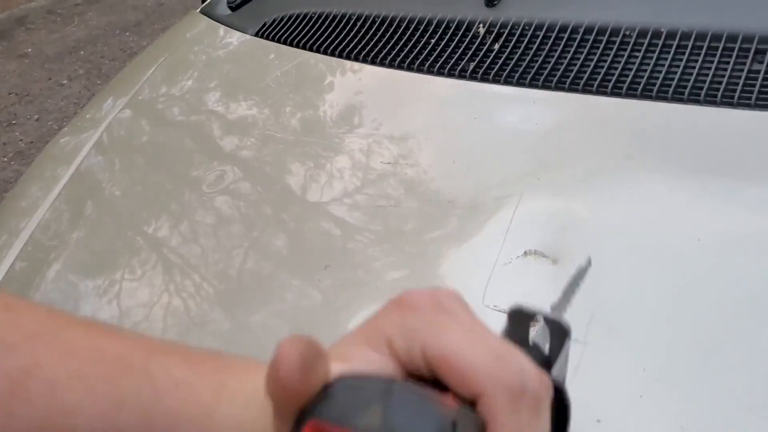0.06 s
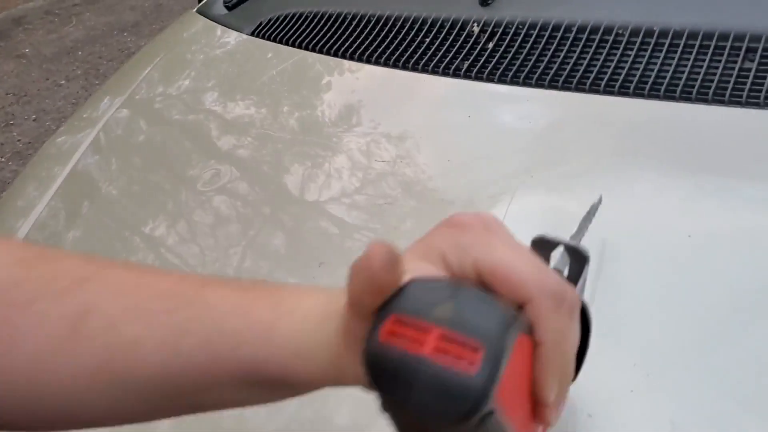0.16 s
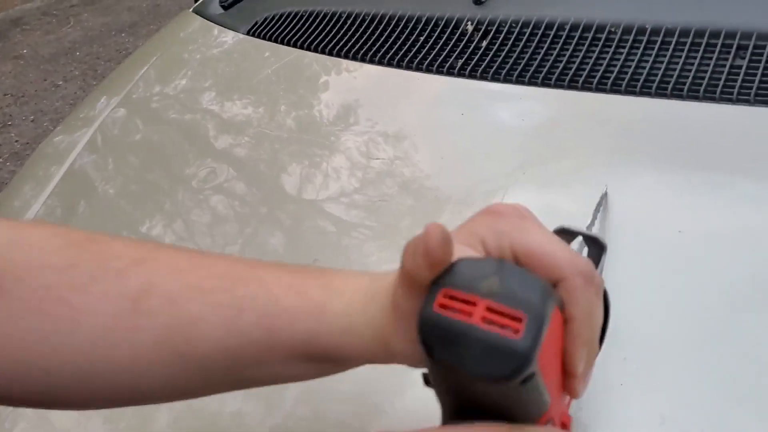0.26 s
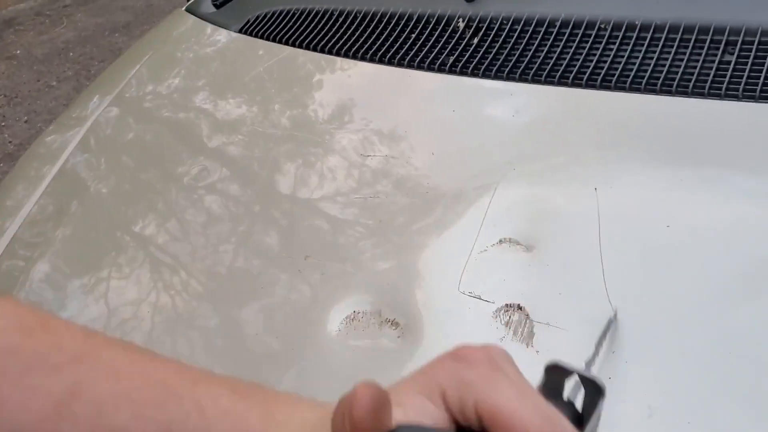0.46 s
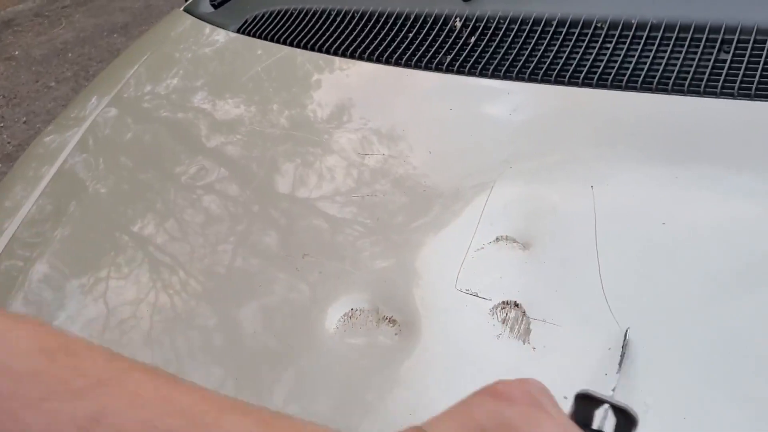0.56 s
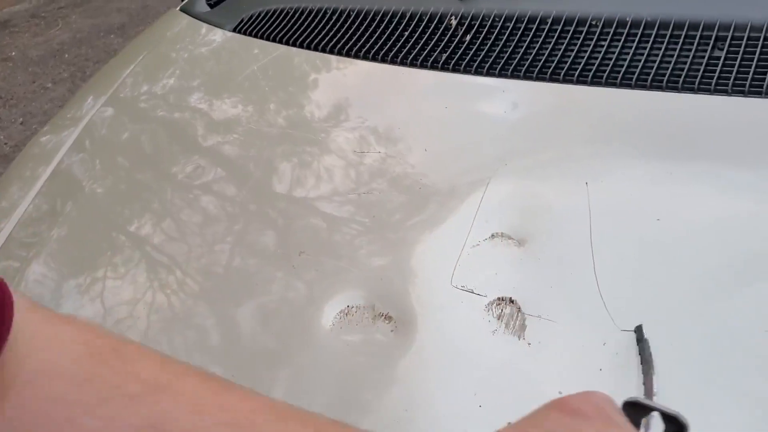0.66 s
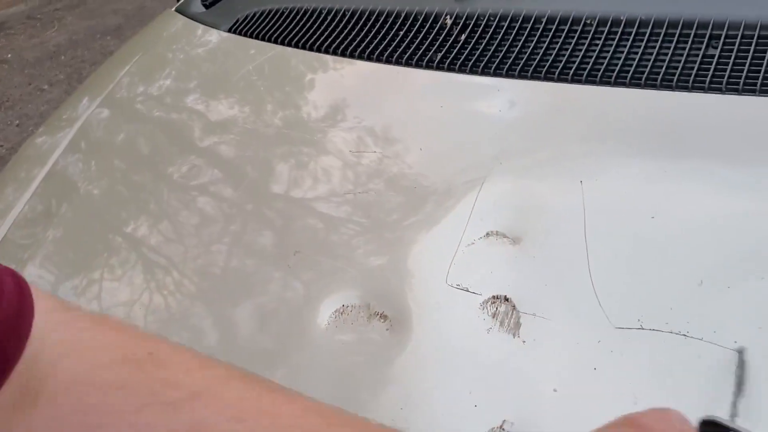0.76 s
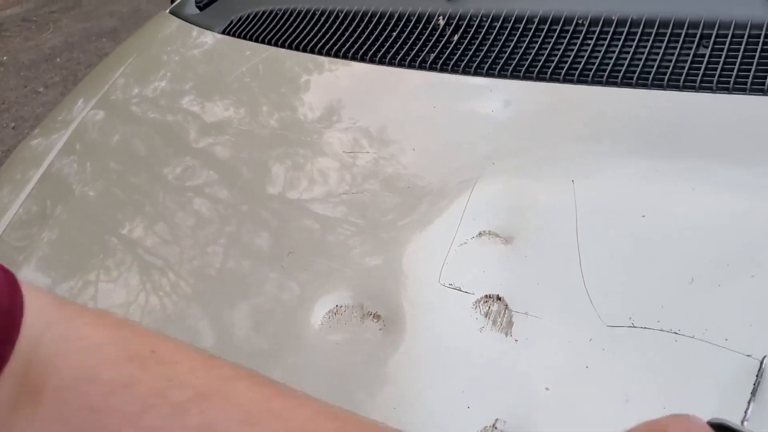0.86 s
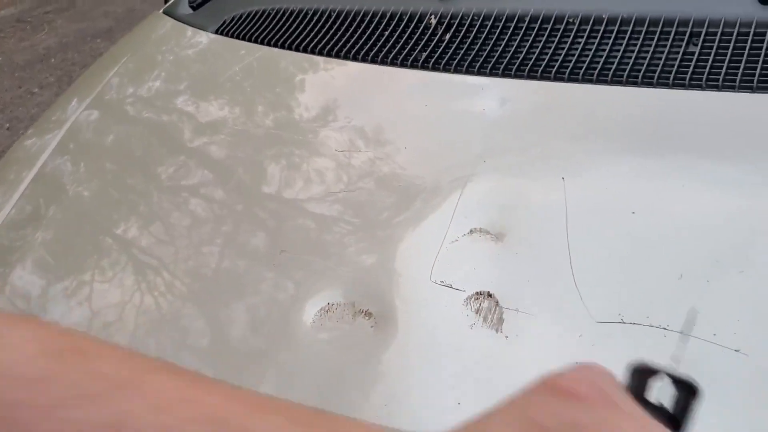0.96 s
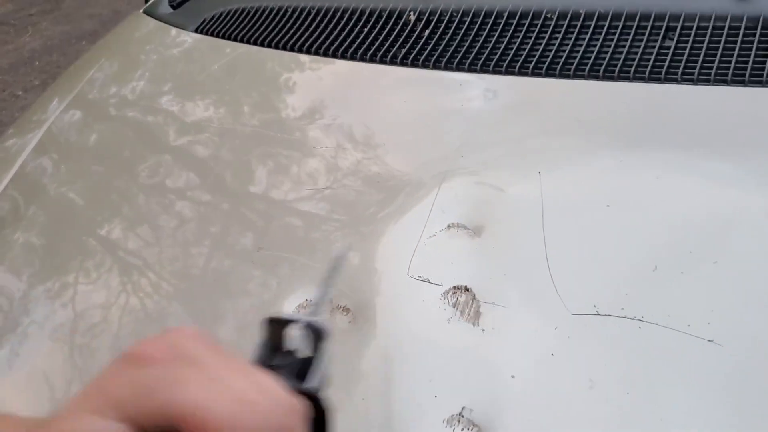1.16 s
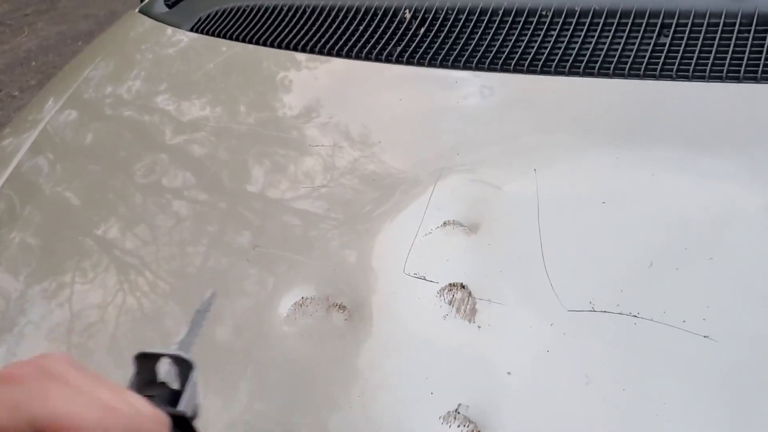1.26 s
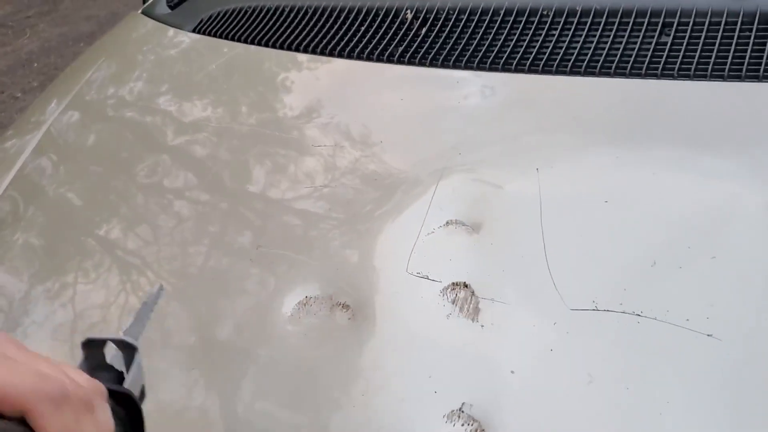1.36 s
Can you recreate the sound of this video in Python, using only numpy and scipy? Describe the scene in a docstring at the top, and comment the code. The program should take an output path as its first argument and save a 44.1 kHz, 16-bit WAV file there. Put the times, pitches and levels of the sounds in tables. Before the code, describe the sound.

Metal blade point scratches sheet steel twice, the second harsh and booming, over an idling engine

```python
"""Saw blade on a car bonnet

The tip of a stopped blade is set down, dragged lightly through the paint, then dug in for a hard second stroke.
Random stick-slip jerks and single blows drive decaying noise and sine modes of blade and sheet; bent tones groan.
The sheet flexes with a low boom, and the blade ticks twice, the second fainter, as it is lifted.
Behind: an idling engine (pulses through resonances), bird whistles (gliding tones), open air (noise)."""
import sys
import numpy as np
from scipy import signal
from scipy.fft import rfft, irfft
from scipy.io import wavfile

SR = 44100
rng = np.random.default_rng(int(sys.argv[2]) if len(sys.argv) > 2 else 0)


def materialize(psi):
    """Save the field psi as 16-bit PCM at rate SR to the path in sys.argv[1].

    A 1-D psi becomes a single channel; in a 2-D psi each row is a channel.
    """
    bounded = np.clip(np.atleast_2d(psi).T, -1, 1)
    quanta = np.round(bounded * 32767).astype(np.int16)
    wavfile.write(sys.argv[1], SR, quanta)


N = 61739  # samples, 1.4 s

# Light stroke, as level curves. Each row: time in seconds, paint grit in dB, rasp into the sheet in dB,
# low judder in dB.
DRAG = [(0.265, -60, -62, -92), (0.298, -49.5, -40.5, -35), (0.35, -52, -50, -63), (0.393, -49, -40, -49.5),
        (0.400, -40.5, -19, -29.5), (0.412, -38.5, -30.5, -54), (0.44, -44, -29, -38),
        (0.468, -55, -45.5, -32.5), (0.505, -62, -50, -59), (0.55, -82, -50, -56)]
# Hard stroke. Each row: time in seconds, grit in dB, rasp in dB, judder in dB.
GOUGE = [(0.617, -66, -34, -53), (0.622, -46, -21, -34), (0.629, -71, -53, -24.5), (0.647, -45, -34.5, -68),
         (0.654, -36, -35, -34), (0.685, -26.5, -29.5, -25.5), (0.708, -31, -23, -43),
         (0.728, -38, -28, -33), (0.754, -44, -33, -32.5), (0.792, -51.5, -36.5, -32),
         (0.808, -68, -45.5, -39.5), (0.84, -83, -50, -56)]
# Noise colours of rasp (drag, gouge), judder and grit. Each row: frequency in Hz, relative density in dB per Hz.
DRAG_COLOUR = [(300, -13), (750, -11.5), (900, -5.5), (1150, -1.5), (1400, -5.5), (1750, 3), (2100, -2.5),
               (2700, -7), (3100, -11.5), (3800, -22.5), (8000, -58)]
GOUGE_COLOUR = [(300, -11.5), (600, -8.5), (900, -5.5), (1250, -3), (1450, -18), (1680, 3.5), (2050, -5.5),
                (2500, -7), (3500, -5.5), (5000, -24), (9000, -33)]
JUDDER_COLOUR = [(90, -8), (160, -6), (250, -14.5), (340, -12), (420, -6.5), (600, -12.5), (720, -12.5),
                 (1100, -23), (3000, -54)]
GRIT_COLOUR = [(500, -36.5), (2000, -14.5), (4000, -9), (5200, -6), (6800, -6), (8300, -8), (9600, -15.5),
               (11000, -7), (13000, 0), (15500, -12.5)]
# Decay of the sheet's dense upper modes, and of the blade. Each row: frequency in Hz, T60 in seconds.
SHEET_T60_S = [(200, 0.33), (500, 0.37), (1000, 0.28), (2000, 0.12), (4000, 0.11), (8000, 0.076)]
BLADE_T60_S = [(1500, 0.19), (5000, 0.066), (14000, 0.026)]
DRAG_BRIGHT_HZ, GOUGE_BRIGHT_HZ = 15500, 15800  # low-pass on the grit
SLIPS_PER_S, SLIP_SPREAD_DB = 2200, 5  # mean rate; scale of the uneven jerk sizes
CHATTER_DB, CHATTER_HZ = 3.0, 162  # random waver of tip pressure: spread, corner

# Sheet modes singing under the tip, bent by its pressure, one list per groan.
# Each row: time in seconds, pitch in Hz, level in dB.
GROANS = [
    [(0.395, 1720, -65), (0.399, 1680, -29.5), (0.406, 1646, -33), (0.416, 1570, -55)],
    [(0.402, 1150, -49), (0.415, 1046, -35.5), (0.432, 986, -29), (0.455, 960, -34), (0.478, 850, -64)],
    [(0.617, 330, -30), (0.63, 348, -42), (0.65, 337, -24), (0.67, 381, -38.5), (0.70, 382.2, -47),
     (0.75, 343, -41), (0.785, 327.3, -31), (0.82, 312, -38), (0.91, 299.5, -56.5)],
    [(0.68, 1190, -34), (0.71, 1205, -29), (0.735, 1280, -29.5), (0.78, 1320, -52)],
]
GROAN_ROUGH, GROAN_FLUTTER_HZ = 0.35, 60  # rms share of level; waver corner

# Tip strikes or catches. Each row: time in seconds, sheet ring in dB, blade crack in dB, crack low-pass in Hz.
BLOWS = [(0.2237, -21.5, -24, 9000), (0.2285, -20.5, -31.5, 11800), (0.25, -31.5, -73, 9050),
         (0.5616, -76, -50, 15000), (0.607, -73, -48, 17800), (0.6189, -36.5, -32, 14000),
         (0.6216, -33.5, -31.5, 16000), (0.6500, -34, -19.5, 18000), (0.667, -40, -26.5, 18200),
         (0.6698, -55, -23.5, 18000)]
# Distinct modes of the sheet. Each row: frequency in Hz, relative level in dB, T60 in seconds.
SHEET_MODES = [(252, 6.5, 0.077), (206.3, -3.5, 0.32), (303, -2, 1), (454.6, -6.5, 0.48), (674, -2, 0.25),
               (806, -5, 0.24), (887, 3, 0.18), (1007.5, 3.5, 0.28), (1197, -2.5, 0.096), (1396, -15, 0.11),
               (1746, 8, 0.074), (2306, -5.5, 0.28)]
# Noise colours of a blow in the sheet and in the blade. Each row: frequency in Hz, relative density in dB per Hz.
BLOW_COLOUR = [(150, -43), (240, 5), (320, 8), (420, -0.5), (600, -3), (800, 1), (1050, -7), (1350, -1),
               (1750, 4), (2100, -11.5), (3000, -17), (4500, -24.5), (9000, -37)]
BLADE_COLOUR = [(500, -65), (1800, 7), (3500, -2.5), (5000, -9), (6200, -6.5), (8200, -4), (9600, -17.5),
                (11000, -9), (12800, 0), (15500, -12.5)]
SHEET_MODES_DB, SHEET_DENSE_DB = -12.5, 2
SHEET_LOW_HZ = 600  # modes up to here reach both sides in step
RING_S, CONTACT_S = 0.45, 0.00068  # response length; build-up over the contact

# Tip snags and tears free: once on first touch, then a run in the hard stroke.
# Each row: time in seconds, level in dB.
SNAGS = [(0.2015, -39), (0.6235, -20), (0.6825, -18), (0.6955, -19), (0.7045, -17), (0.7125, -17.5),
         (0.7205, -18.5), (0.731, -20.5), (0.7385, -24), (0.7475, -19.5), (0.766, -24), (0.7785, -29),
         (0.791, -27)]
# Snag noise colour. Each row: frequency in Hz, relative density in dB per Hz.
SNAG_COLOUR = [(450, -8.5), (800, -3), (1250, -3), (1750, 5.5), (2200, -12), (3500, -9.5), (5000, -18),
               (9500, -32), (15000, -17.5)]
# Snag decay. Each row: frequency in Hz, T60 in seconds.
SNAG_T60_S = [(1000, 0.032), (8000, 0.022)]

# Sheet pushed in and springing back. Each row: start in seconds, level in dB, starting pitch in Hz,
# swell time constant in seconds.
FLEXES = [(0.231, -17, 66.5, 0.0019), (0.489, -28.5, 99.6, 0.0041), (0.623, -18, 108.8, 0.0018),
          (0.649, -7, 95.9, 0.0062), (0.677, -4, 71.6, 0.0028)]
FLEX_HZ, FLEX_SETTLE_S, FLEX_T60_S = 58.94, 0.037, 0.4  # resting pitch, settling time constant, decay
FLEX_LOW_CUT_HZ = 56  # the sheet radiates little below this

# Blade ticks as it is lifted. Each row: time in seconds, level in dB.
TICKS = [(1.1851, -22), (1.3965, -34.5)]
# Modes of the blade in its clamp. Each row: frequency in Hz, relative level in dB, T60 in seconds.
CLAMP_MODES = [(1500, -10.5, 0.012), (1780, 0, 0.0084), (2415, -0.5, 0.013), (3000, -7, 0.012)]
# Tick noise colour. Each row: frequency in Hz, relative density in dB per Hz.
TICK_COLOUR = [(400, -14), (1200, -3), (1700, 4), (2100, -3), (2450, 3.5), (3100, -7), (3900, -18),
               (9500, -27.5), (14000, -22)]
TICK_RATTLE_DB, TICK_T60_S = -1, 0.008
TICK_TAIL_DB, TICK_TAIL_T60_S = -19, 0.12

# Firing strengths over one engine cycle, in dB, one per cylinder.
FIRING_DB = [-2.5, -12, -5.5, -12, -7, -18.5]
# Exhaust resonances. Each row: frequency in Hz, relative level in dB, T60 in seconds.
EXHAUST_MODES = [(71.7, -3.5, 0.08), (110.7, 1.5, 0.08), (185.2, -3.5, 0.097)]
FIRST_FIRING_S, CYCLE_S, FIRING_SPREAD_DB = 0.0033, 0.1643, 1
ENGINE_DB, MUFFLER_HZ = -36, 194  # rms level; low-pass

# Bird whistles, one list per call. Each row: time in seconds, pitch in Hz, level in dB.
WHISTLES = [
    [(0.055, 4640, -76), (0.092, 4640, -61), (0.122, 4665, -55), (0.148, 4860, -59), (0.168, 4900, -78),
     (0.194, 4950, -68), (0.215, 4960, -78)],
    [(0.76, 3330, -50), (0.825, 3290, -55), (0.86, 3140, -53), (0.917, 3100, -55), (0.932, 3950, -64),
     (0.955, 4480, -73), (0.99, 4500, -79)],
]
# Warble of each call, as a share of its first pitch.
WARBLE_DEPTHS = [.003, .032]
# Echoes from the surroundings. Each row: delay in seconds, level in dB.
ECHOES = [(0.02, -14.5), (0.046, -19), (0.079, -11.5)]
WARBLE_HZ, WHISTLE_FLUTTER, FLUTTER_HZ = 33.6, 0.19, 80  # flutter: rms share of level, waver corner

# Open-air noise colour. Each row: frequency in Hz, relative density in dB per Hz.
AIR_COLOUR = [(18, -18), (30, -50), (45, 6.5), (120, 18.5), (220, -1), (300, -3.5), (600, -13),
              (1000, -8.5), (1300, -12.5), (1900, -11.5), (2600, -21), (4000, -30.5), (6000, -40),
              (8200, -40), (9500, -51.5), (15000, -43.5)]
# Air level: drops early, then slowly rises. Each row: time in seconds, rms level in dB.
AIR_LEVEL = [(0, -32.5), (0.2, -41), (0.6, -37), (1.4, -35.5)]

# Stereo likeness. Each row: frequency in Hz, left-right correlation from -1 to 1.
LIKENESS = [(60, 0.87), (200, 1), (380, 0.9), (700, 0.65), (1300, -0.032), (2400, 0.043), (8000, 0.075)]
# Stereo place of the work. Each row: frequency in Hz, left minus right in dB.
BALANCE_DB = [(100, -4), (400, 1.5), (800, -2.5), (2400, -2), (4400, -2.5), (14000, -3.5)]
SIDES = np.array([[1], [-1]])  # left, right
CUTOFF_HZ = 16000


def from_db(db):
    """Decibels to gain."""
    return 10 ** (np.asarray(db) / 20)


def at_hz(points, hz):
    """Read a table on a log-frequency axis."""
    f, v = np.transpose(points)
    return np.interp(np.log(np.maximum(hz, 1)), np.log(f), v)


def rms_one(x):
    """Scale to rms 1."""
    return x / np.sqrt(np.mean(x ** 2) + 1e-20)


def unit_energy(x):
    """Scale a stereo response to pass white noise at equal mean power."""
    return x / np.sqrt(np.sum(x ** 2) / 2 + 1e-20)


def cut(x, hz, kind, order=2):
    """Butterworth low-pass or high-pass."""
    sos = signal.butter(order, min(hz, 0.45 * SR), kind, fs=SR, output="sos")
    return signal.sosfilt(sos, x + 1e-18)


def drift(rate_hz):
    """Low-passed random waver, rms 1."""
    r = np.exp(-2 * np.pi * rate_hz / SR)
    waver = signal.lfilter([1], [1, -2 * r, r * r], rng.standard_normal(2 * N))
    return rms_one(waver[N:])  # settled half


def noise(colour, size, placed=True):
    """Steady coloured stereo noise, rms 1; placed applies the bonnet's left-right balance."""
    hz = np.fft.rfftfreq(size, 1 / SR)
    mid, side = np.exp(2j * np.pi * rng.random((2, len(hz))))
    alike = np.clip(at_hz(LIKENESS, hz), -1, 1)
    balance_db = placed * SIDES * at_hz(BALANCE_DB, hz) / 2
    gain = from_db(at_hz(colour, hz) + balance_db) * (hz > 10)
    spectrum = np.sqrt(1 + alike) * mid + SIDES * np.sqrt(1 - alike) * side
    return rms_one(irfft(gain * spectrum, size))


def dense_ring(colour, t60s):
    """Dense modes as rms-1 noise, each band dying at its own rate, swelling in over the contact."""
    size = int(RING_S * SR)
    t = np.arange(size) / SR
    hz = np.fft.rfftfreq(size, 1 / SR)
    spectrum = rfft(noise(colour, size))
    centres = [f for f, _ in t60s]
    ring = 0
    for weights, (_, t60) in zip(np.eye(len(centres)), t60s):
        share = at_hz(list(zip(centres, weights)), hz)  # overlapping bands
        ring = ring + irfft(spectrum * share, size) * from_db(-60 * t / t60)
    return (1 - np.exp(-t / CONTACT_S)) * ring


def mode(hz, db, t60):
    """One decaying sine."""
    t = np.arange(int(RING_S * SR)) / SR
    return from_db(db - 60 * t / t60) * np.sin(2 * np.pi * hz * t)


def clicks(times, dbs):
    """Single-sample impulses at the given times."""
    at = np.maximum(np.asarray(times) * SR, 0).astype(int)
    return np.bincount(at, from_db(dbs), 2 * N)[:N]


def through(force, response):
    """Convolve a force with a response, channel by channel."""
    return signal.fftconvolve(force[None], response, axes=1)[:, :N]


def wavering_tone(rows, flutter, rate_hz, pitch_share):
    """Complex gliding tone with random waver of level and pitch."""
    t = np.arange(N) / SR
    s, hz, db = np.transpose(rows)
    pitch = np.interp(t, s, hz) * (1 + pitch_share * drift(rate_hz))
    gain = from_db(np.interp(t, s, db, left=-np.inf, right=-np.inf))
    gain = gain * (1 + flutter * drift(rate_hz))
    return gain * np.exp(2j * np.pi * np.cumsum(pitch) / SR)


def slips(rows):
    """Stick-slip: one random train of uneven jerks, under each level curve of a stroke."""
    t = np.arange(N) / SR
    s, *levels = np.transpose(rows)
    sizes = from_db(SLIP_SPREAD_DB * np.minimum(rng.exponential(1, N), 3)) * rng.choice([-1, 1], N)
    pressure = from_db(CHATTER_DB * drift(CHATTER_HZ))
    happens = rng.random(N) < SLIPS_PER_S / SR
    jerks = rms_one(sizes * pressure * happens)
    return [jerks * from_db(np.interp(t, s, db, left=-np.inf, right=-np.inf)) for db in levels]


def stroke(rows, colour, bright_hz):
    """The sliding tip's jerks crackle in the paint and shake upper and lower sheet modes."""
    grit, rasp, judder = slips(rows)
    crackle = through(cut(grit, bright_hz, "low"), unit_energy(dense_ring(GRIT_COLOUR, BLADE_T60_S)))
    upper = through(rasp, unit_energy(dense_ring(colour, SHEET_T60_S)))
    lower = through(judder, unit_energy(dense_ring(JUDDER_COLOUR, SHEET_T60_S)))
    return crackle + upper + lower


def groans():
    """Tip pressure bends single sheet modes; phase and level differ between sides by frequency."""
    out = 0
    for rows in GROANS:
        hz = rows[0][1]
        phase = SIDES * np.arccos(np.clip(at_hz(LIKENESS, hz), -1, 1)) / 2
        place = np.exp(1j * phase) * from_db(SIDES * at_hz(BALANCE_DB, hz) / 2)
        tone = wavering_tone(rows, GROAN_ROUGH, GROAN_FLUTTER_HZ, pitch_share=0.0074)
        out = out + np.sqrt(2) * np.real(place * tone)
    return out


def struck_sheet():
    """Sheet response: dense ring plus distinct modes, with fresh random signs for each spot struck."""
    clear = 0
    for row in SHEET_MODES:
        signs = rng.choice([-1, 1], 2)
        right = int(row[0] > SHEET_LOW_HZ)  # low modes share the left sign
        clear = clear + mode(*row) * signs[[0, right], None]
    return from_db(SHEET_DENSE_DB) * dense_ring(BLOW_COLOUR, SHEET_T60_S) + from_db(SHEET_MODES_DB) * clear


def blows():
    """Each blow is an impulse that cracks in the blade and rings the sheet."""
    rings, cracks = 0, 0
    for at_s, ring_db, crack_db, bright_hz in BLOWS:
        rings = rings + through(clicks([at_s], [ring_db]), struck_sheet())
        cracks = cracks + cut(clicks([at_s], [crack_db]), bright_hz, "low")
    return rings + through(cracks, dense_ring(BLADE_COLOUR, BLADE_T60_S))


def snags():
    """Each snag lets go as a short, dry noise burst from blade and nearby steel."""
    return sum(through(clicks([s], [db]), dense_ring(SNAG_COLOUR, SNAG_T60_S)) for s, db in SNAGS)


def flexing():
    """Lowest bonnet mode: stiffer while pressed, pitch sinking exponentially as it relaxes."""
    out = 0
    for s, db, start_hz, swell_s in FLEXES:
        t = np.maximum(np.arange(N) / SR - s, 0)
        bend = (start_hz - FLEX_HZ) * FLEX_SETTLE_S * (1 - np.exp(-t / FLEX_SETTLE_S))
        turns = FLEX_HZ * t + bend  # integral of pitch
        envelope = from_db(db - 60 * t / FLEX_T60_S) * (1 - np.exp(-t / swell_s))
        out = out + envelope * np.sin(2 * np.pi * turns)
    return cut(out, FLEX_LOW_CUT_HZ, "high")


def ticks():
    """The loose blade knocks in its clamp: short modes, a noise rattle and a faint tail."""
    size = int(RING_S * SR)
    t = np.arange(size) / SR
    rattle = from_db(TICK_RATTLE_DB - 60 * t / TICK_T60_S)
    tail = from_db(TICK_TAIL_DB - 60 * t / TICK_TAIL_T60_S)
    knock = sum(mode(*row) for row in CLAMP_MODES) + noise(TICK_COLOUR, size) * (rattle + tail)
    return through(clicks(*np.transpose(TICKS)), knock * (1 - np.exp(-t / CONTACT_S)))


def engine():
    """Evenly timed firings of uneven strength excite exhaust resonances behind a muffler low-pass."""
    count = len(FIRING_DB)
    k = np.arange(int(N / SR / CYCLE_S * count) + 1)
    strengths_db = np.array(FIRING_DB)[k % count] + FIRING_SPREAD_DB * rng.standard_normal(len(k))
    firings = clicks(FIRST_FIRING_S + k * CYCLE_S / count, strengths_db)
    pipe = sum(mode(*row) for row in EXHAUST_MODES)
    pipe = cut(pipe, MUFFLER_HZ, "low", order=6)
    pipe = cut(pipe, 76, "high")
    return from_db(ENGINE_DB) * rms_one(through(firings, pipe[None]))


def bird():
    """Thin gliding whistles with sinusoidal warble and random flutter, plus discrete echoes."""
    t = np.arange(N) / SR
    song = 0
    for rows, depth in zip(WHISTLES, WARBLE_DEPTHS):
        warble = depth * rows[0][1] / WARBLE_HZ * np.sin(2 * np.pi * WARBLE_HZ * t)  # radians
        tone = wavering_tone(rows, WHISTLE_FLUTTER, FLUTTER_HZ, pitch_share=0.0053)
        song = song + (tone * np.exp(1j * warble)).real
    return song + sum(from_db(db) * np.interp(t - delay, t, song, left=0) for delay, db in ECHOES)


def open_air():
    """Diffuse background: coloured stereo noise under a slow level curve."""
    level_db = np.interp(np.arange(N) / SR, *np.transpose(AIR_LEVEL))
    return from_db(level_db) * noise(AIR_COLOUR, N, placed=False)


def scene():
    """Work on the bonnet over engine, bird and open air."""
    drag = stroke(DRAG, DRAG_COLOUR, DRAG_BRIGHT_HZ)
    gouge = stroke(GOUGE, GOUGE_COLOUR, GOUGE_BRIGHT_HZ)
    work = drag + gouge + groans() + blows() + snags() + flexing() + ticks()
    return work + engine() + bird() + open_air()


def record(dry):
    """Steep elliptic low-pass on the top."""
    return signal.sosfilt(signal.ellip(10, 0.2, 80, CUTOFF_HZ, fs=SR, output="sos"), dry)


dry = scene()
out = record(dry)
materialize(out)
```